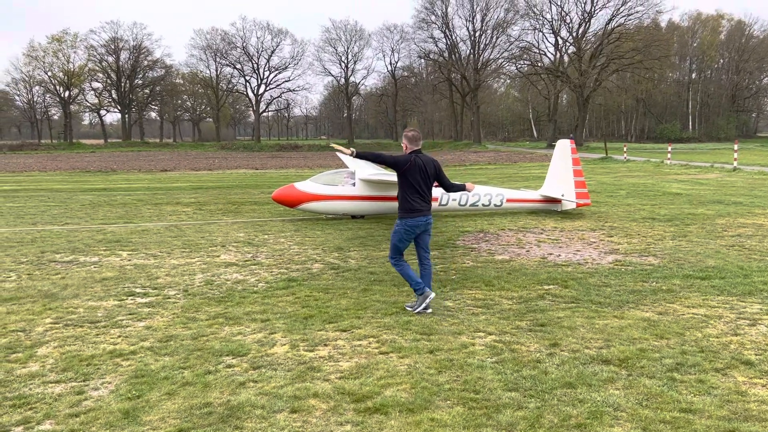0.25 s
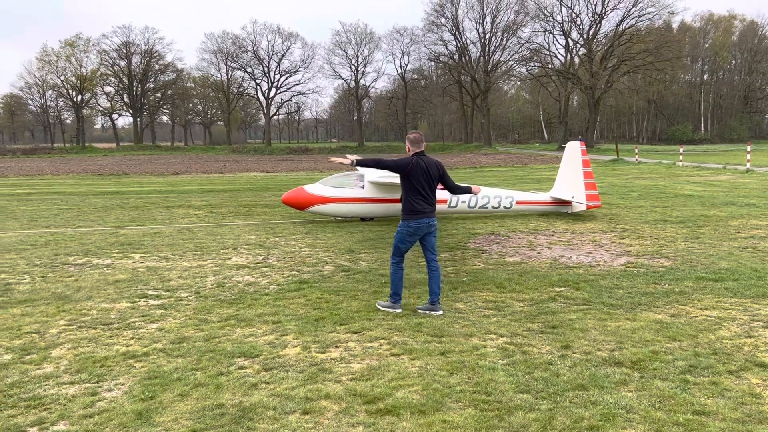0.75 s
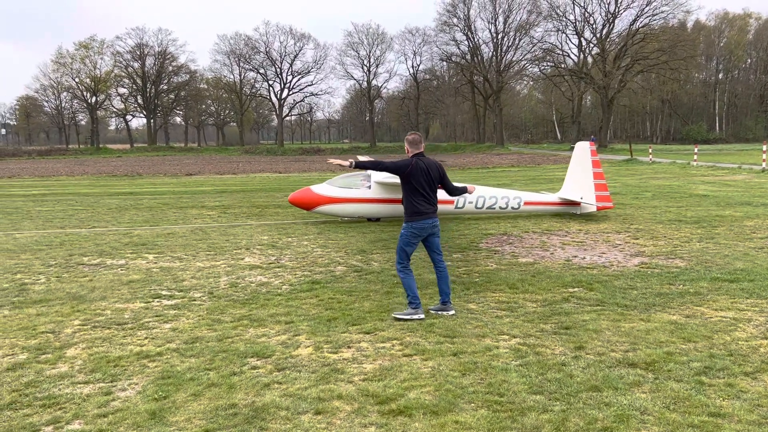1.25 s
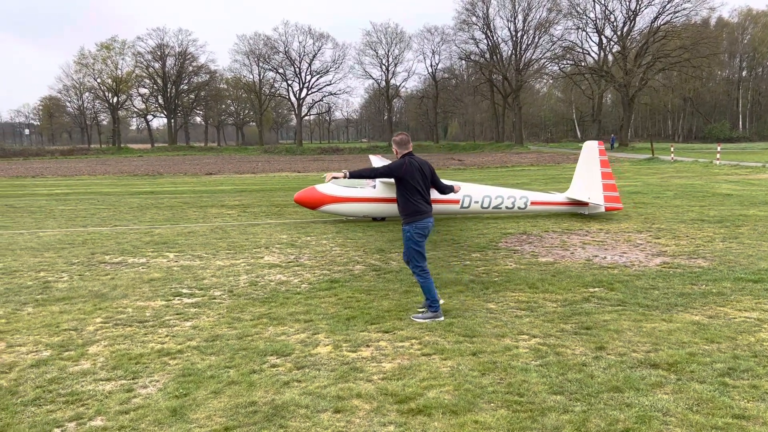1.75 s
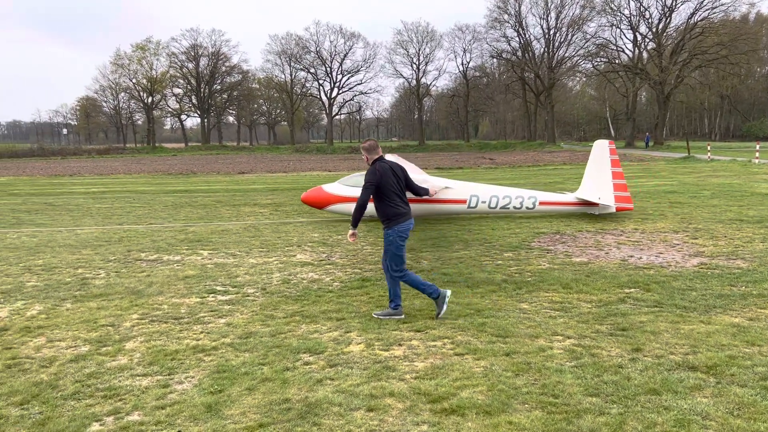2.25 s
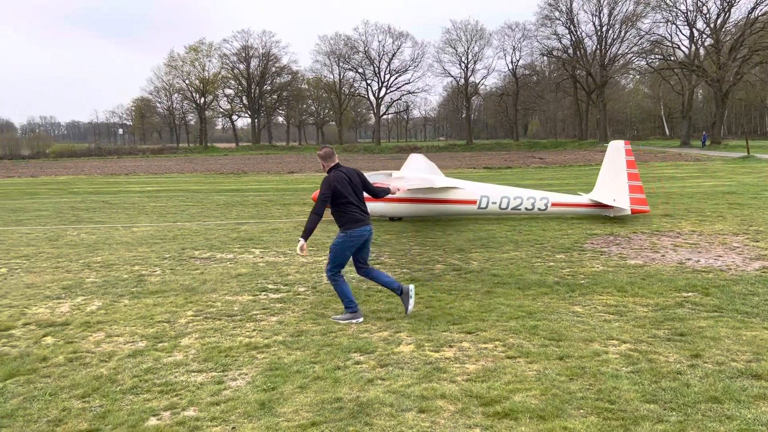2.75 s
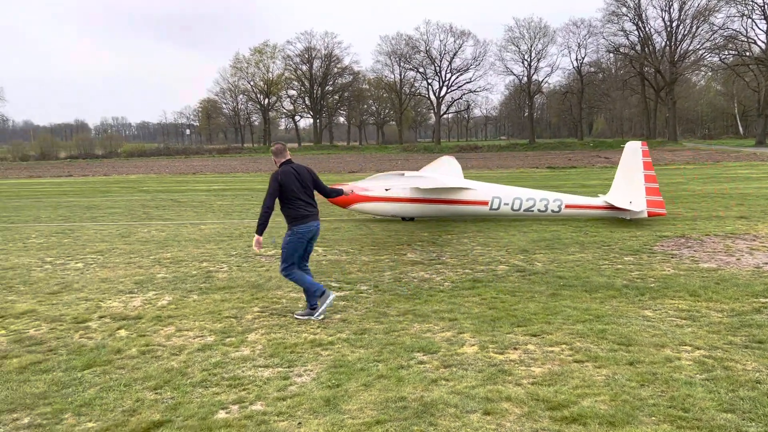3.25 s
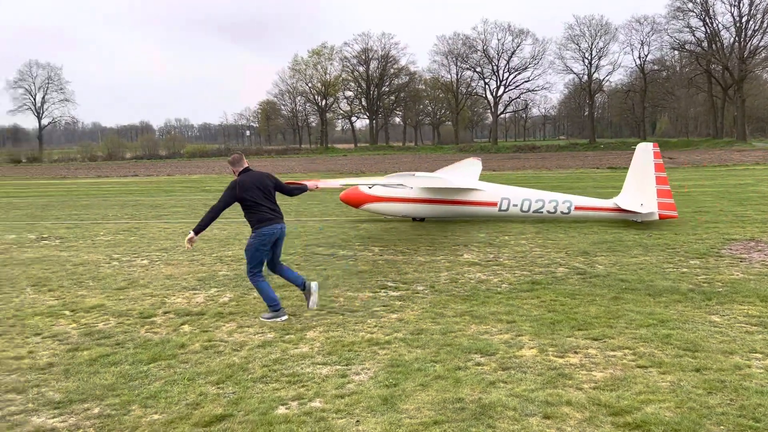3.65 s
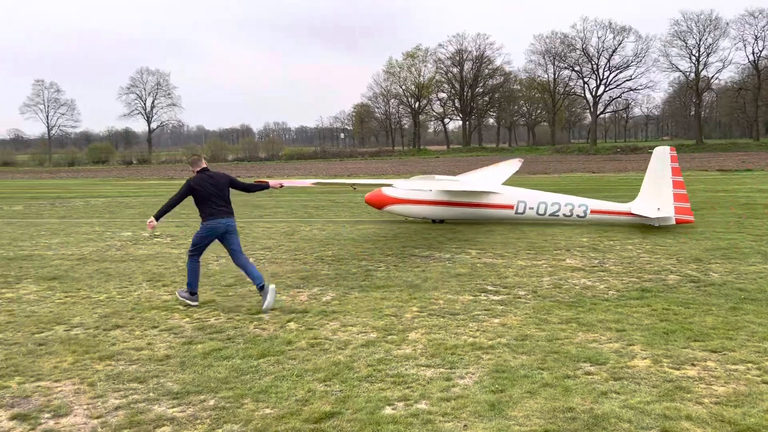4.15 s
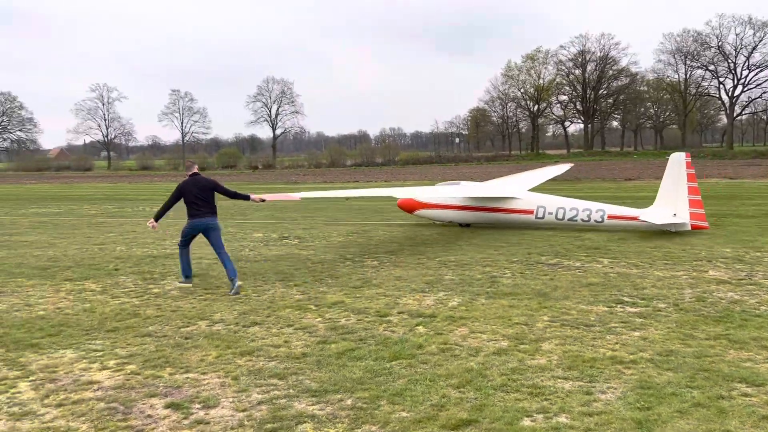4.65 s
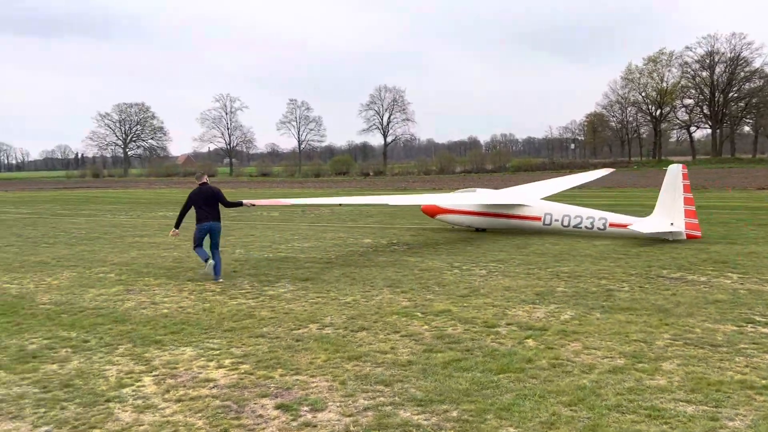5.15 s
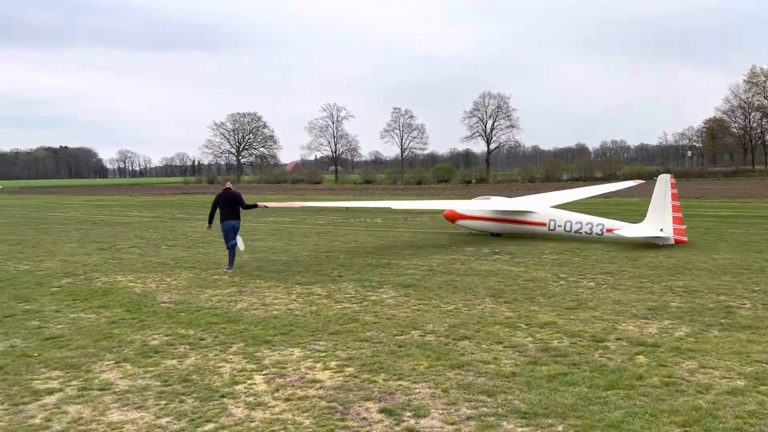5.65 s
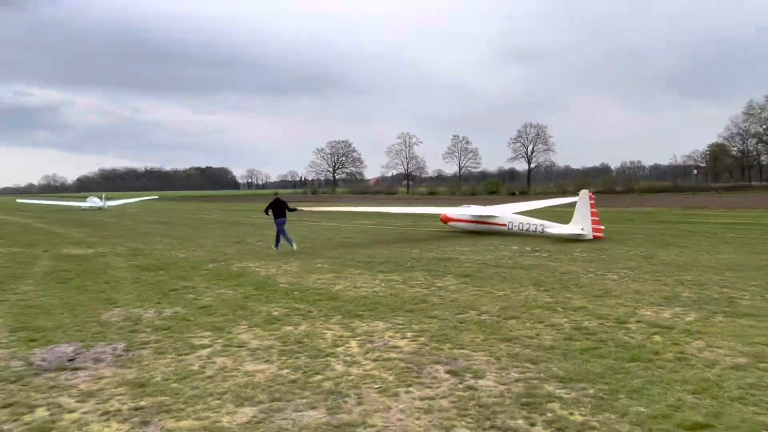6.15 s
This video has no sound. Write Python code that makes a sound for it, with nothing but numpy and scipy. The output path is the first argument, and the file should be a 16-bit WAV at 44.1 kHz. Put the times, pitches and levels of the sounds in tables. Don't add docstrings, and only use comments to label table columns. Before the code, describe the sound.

Outdoors on grass, a far-off small propeller engine sputters, revs up within two seconds and holds a raspy drone under buffeting wind gusts.

```python
import sys
import numpy as np
from scipy import signal
from scipy.fft import rfft, irfft, next_fast_len
from scipy.io import wavfile
from scipy.ndimage import uniform_filter1d

SR = 44100
rng = np.random.default_rng(int(sys.argv[2]) if len(sys.argv) > 2 else 0)


def voltage_ratio(decibels):
    exponent = np.asarray(decibels, float) / 20
    return 10 ** exponent


def digitize_waveform(pressure):
    field = np.atleast_2d(pressure).T
    bounded = np.clip(field, -1, 1)
    quanta = np.round(bounded * 32767).astype(np.int16)
    wavfile.write(sys.argv[1], SR, quanta)


N = 281710
FULL_HZ = 81.5
OPPOSITE = np.array([[1], [-1]])


def curves(table):
    s, *columns = np.transpose(table)
    return [np.interp(np.arange(N) / SR, s, c) for c in columns]


def at(table, hz):
    f, v = np.transpose(table)
    return np.interp(np.log(hz), np.log(f), v)


def bump(s, length):
    return np.exp(-((np.arange(N) / SR - s) / max(length, .005)) ** 2)


def walk(rate):
    k = int(SR / rate)
    held = np.repeat(rng.standard_normal(N // k + 1), k)
    return 1.3 * uniform_filter1d(uniform_filter1d(held, k), k)[:N]


def band(hz, width, colour):
    size = next_fast_len(N)
    f = np.fft.rfftfreq(size, 1 / SR) + 1
    inside = abs(f - hz) < width
    shape = voltage_ratio(at(colour, f[inside])) * np.exp(-(2 * (f[inside] - hz) / width) ** 4)
    spectrum = np.zeros(len(f), complex)
    spectrum[inside] = np.sqrt(size / 2) * shape * (rng.standard_normal((len(shape), 2)) @ [1, 1j])
    return irfft(spectrum, size)[:N]


def steady(colour, db):
    x = band(0, SR, colour)
    return voltage_ratio(db + walk(10)) * x / x.std()


def tones(turns, orders, flutter_db, drift):
    out = 0
    for k, db in orders:
        level = np.sqrt(2) * voltage_ratio(db + flutter_db * walk(5))
        phase = 2 * np.pi * k * turns + drift * np.sqrt(k) * walk(6) + 7 * rng.random()
        out = out + level * np.sin(phase)
    return out


# time in seconds, blade rate in Hz.
BLADE_RATE = [
    (0, 40.14),
    (.49, 48.81),
    (.8, 51.92),
    (1.27, 55.84),
    (1.45, 61.16),
    (1.7, 69.61),
    (2.09, 78.3),
    (2.3, 79.84),
    (2.55, 81.05),
    (6.39, 80.93),
]


def blade_rate():
    hz = np.minimum(curves(BLADE_RATE)[0], FULL_HZ)
    return uniform_filter1d(hz, size=SR // 8, mode="nearest")


# time in seconds, blade level in dB, overtones against the fundamental in dB.
PROPELLER_LEVEL = [(0, -39.5, -2), (.2, -44.5, 3), (.8, -33.5, -1.5), (1.25, -25.5, -8), (1.7, -23, -2.5),
                   (2.15, -29, 9), (2.45, -30.5, 6.5), (2.9, -30.5, 5.5), (3.25, -27.5, 5.5),
                   (3.65, -25.5, 4.5), (3.95, -25, -0.5), (4.55, -25.5, -2), (4.9, -22, -9.5),
                   (5.2, -20.5, -7.5), (5.5, -23, -31.5), (5.75, -22.5, -14), (5.95, -18.5, -13.5),
                   (6.39, -29.5, -8.5)]
# frequency in Hz, level in dB.
RADIATION = [(42, -24.5), (55, -11.5), (68, -0.5), (105, 3.5), (140, 1), (215, -0.5), (245, -8), (325, -23)]
BLADE_SHAPE = [.9, -1.2, -2.2, -3.5]
# time in seconds, tone number, length in seconds, change in dB.
TONE_FADES = [(0.549, 4, 0.33, 4.5), (0.797, 3, .4, 3), (0.97, 1, 0.076, -15), (1.505, 3, 0.098, 4.5),
              (1.64, 4, 0.22, 5), (2.15, 4, 0.055, -11), (2.588, 3, .15, -5), (3.105, 4, .35, 9.5),
              (3.565, 3, 0.13, -7), (3.7, 4, .15, -8), (3.99, 3, 0.069, 3.5), (4.158, 3, 0.13, -12.5),
              (4.19, 2, 0.13, -18.5), (4.74, 3, 0.23, -14), (4.977, 2, 0.091, -6.5), (5.151, 3, 0.12, 4),
              (5.408, 1, 0.012, -16.5), (5.582, 1, 0.017, -9), (5.727, 1, 0.021, -8.5), (5.95, 2, .12, 3),
              (9.1, 1, .02, -9), (2.3, 1, 0.014, -3), (6.222, 3, .15, -23.5), (.8, 4, .08, -3.5)]
# frequency in Hz, level in dB.
UPPER_TONES = [(210, -45), (270, -43), (330, -50), (400, -61), (480, -58), (600, -57), (750, -56),
               (950, -48), (1150, -46), (1400, -57), (1700, -63), (2200, -68)]


def propeller(hz, beats):
    level_db, overtone_db = curves(PROPELLER_LEVEL)
    tone_db = []
    for k in (1, 2, 3, 4):
        step_db = -2.5 * max(k - 2, 0)
        tone_db.append(level_db + at(RADIATION, k * hz) + overtone_db * (k > 1) + step_db)
    for s, tone, length, db in TONE_FADES:
        tone_db[round(tone) - 1] = tone_db[round(tone) - 1] + db * bump(s, length)
    low = 0
    for k, db in enumerate(tone_db):
        level = np.sqrt(2) * voltage_ratio(db + 0.6 * walk(20) + .35 * k * walk(9))
        low = low + level * np.sin(2 * np.pi * (k + 1) * beats + BLADE_SHAPE[k])

    slow_db = 2.5 * (FULL_HZ - hz)
    orders = []
    for k in range(5, 27):
        loss_db = slow_db * np.clip(k * hz / 100 - 3.6, 0, 1)
        orders.append((k, at(UPPER_TONES, k * hz) - loss_db))
    beam_db = -6 * (1 - bump(3.7, 1.5))
    upper_db = .5 + .6 * np.minimum(level_db + 32, 0) + beam_db
    return low + voltage_ratio(upper_db) * tones(beats, orders, 3.2, .33)


# multiple of the crank rate, level in dB.
CRANK_TONES = [(.5, -50), (1, -50.5), (1.5, -62), (2, -33), (3, -51), (4, -56)]
# time in seconds, load in dB.
ENGINE_LOAD = [
    (0, -8.5),
    (.5, -1.5),
    (1.2, -9),
    (1.7, 0.5),
    (2.1, 0),
    (3, -7.5),
    (4.3, -11.5),
    (5, -8),
    (6.39, -11),
]
# frequency in Hz, level in dB per Hz.
EXHAUST_COLOUR = [(60, -7.5), (100, -4.5), (140, 13), (200, 11.5), (280, 6), (370, 0), (480, -39)]


def engine(beats):
    load_db, = curves(ENGINE_LOAD)
    crank_turns = beats * 2.273 / 2
    hum = voltage_ratio(load_db) * tones(crank_turns, CRANK_TONES, 1.4, 0.57)
    return hum + steady(EXHAUST_COLOUR, -39 + 0.43 * load_db)


# time in seconds, rasp level in dB, treble tilt in dB per octave.
RASP_LEVEL = [(0, -3.5, -0.5), (.4, 1.5, -2.5), (.8, 1, -3.5), (1.2, 0.5, -3), (1.5, 0.5, 0), (2, 1.5, 1),
              (2.4, 3, 2), (2.9, 3, 1.5), (3.15, -0.5, 0), (3.6, -3.5, 2), (4.5, -2, 1), (5.2, -5, 3),
              (5.7, -3.5, 2), (6.1, -0.5, .5), (6.39, 0.5, 0.5)]
# frequency in Hz, level in dB per Hz.
RASP_COLOUR = [(300, -21), (420, -7), (600, -7.5), (1150, -5.5), (1400, 0.5), (1650, 0.5), (2000, -5),
               (3000, -7.5), (3500, -13), (4700, -18), (5400, -15.5), (6300, -22), (8600, -26),
               (10500, -33.5), (12500, -37), (14600, -46)]
# time in seconds, centre in Hz, length in seconds, lift in dB.
SWISHES = [(.08, 4100, .06, 1.5), (.19, 6000, 0.035, 12.5), (0.27, 4580, 0.036, 8), (.58, 8500, .012, 11),
           (0.293, 8600, 0.011, 8), (0.198, 3460, 0.17, -4), (0.955, 6140, 0.13, 9.5),
           (0.999, 4400, 0.48, -5), (1.102, 1000, 0.47, 6), (1.412, 6310, 0.17, 15), (1.502, 4860, .1, 3),
           (2.131, 6030, .03, 8), (2.42, 3030, .17, 6), (2.5, 7600, 0.014, 8), (2.84, 3110, 0.13, 6),
           (3.876, 3704, 0.17, 7.5), (3.1, 2220, 0.081, -2), (4.865, 3700, 0.19, 9),
           (5.272, 3700, 0.18, 8.5), (5.627, 4670, 0.11, 7), (6.1, 5000, 0.32, 5.5), (6.3, 10300, .18, 9.5)]
# frequency in Hz, diffuse share.
SCATTER = [(60, .05), (300, 0.15), (600, 1.6), (900, 1), (1500, 0.25), (2500, 0.1), (4500, 0.25),
           (8000, .12), (14000, 0.07)]


def rasp(blade_hz, beats):
    depth = np.interp(blade_hz, [56, 79], [.7, .38])
    beats = beats + .2
    puff_size = voltage_ratio(1.7 * rng.standard_normal(1000))
    puff = np.exp(-(beats % 1) / 0.27) * puff_size[beats.astype(int)]
    puff = 1.3 * uniform_filter1d(puff, size=150)
    level_db, tilt_db = curves(RASP_LEVEL)
    low_db = -1.5 - 0.03 * (FULL_HZ - blade_hz)
    swishes = [(centre, db * bump(s, length)) for s, centre, length, db in SWISHES]
    out, shared = 0, walk(9)
    for hz in 400 * 2 ** np.arange(0, 5.3, 1 / 3):
        octaves = np.log2(hz / 1650)
        if octaves > 0:
            db = level_db + tilt_db * octaves
        else:
            db = level_db + min(-octaves, 1) * (low_db - level_db)
        for centre, swell in swishes:
            if centre / 2 < hz < centre * 2:
                db = db + swell * np.exp(-(np.log2(hz / centre) / .28) ** 2)
        db = db + .7 * shared + 1.2 * walk(18)
        beat = np.clip(depth * min(1, 2600 / hz), 0, 1)
        direct = band(hz, hz / 4, RASP_COLOUR)
        diffuse = np.sqrt(at(SCATTER, hz)) * band(hz, hz / 4, RASP_COLOUR)
        out = out + voltage_ratio(db) * (1 - beat + beat * puff) * np.array([direct, diffuse])
    return voltage_ratio(-46) * out / out[0].std()


# time in seconds, peak in dB.
SLAPS = [(0.0373, -46), (0.086, -46.5), (0.2533, -48.5), (0.3206, -45.5), (.3425, -45.5), (.381, -42.5),
         (0.4064, -38.5), (0.4251, -38.5), (0.4839, -49), (0.6902, -44.5), (0.7278, -45.5), (0.7668, -42),
         (.8475, -45), (0.9952, -52), (1.0323, -46.5), (1.068, -47.5), (1.112, -44), (1.259, -43),
         (1.429, -40.5)]


def blade_slaps():
    out, t = np.zeros(N + SR), np.arange(SR // 4) / SR
    edge = signal.butter(4, [1000, 2900], "band", fs=SR, output="sos")
    envelope = 1.6 * np.exp(-t / .003) * (1 - np.exp(-t / .0008))
    for s, db in SLAPS:
        crack = np.sin(2 * np.pi * 1454 * t) + .9 * rng.standard_normal(len(t))
        out[int(s * SR):][:len(t)] += voltage_ratio(db + 12.5) * signal.sosfilt(edge, crack * envelope)
    return out[:N]


# time in seconds, length in seconds, level in dB.
HISS_MOMENT = (2.374, 0.15, -41)
# frequency in Hz, level in dB per Hz.
HISS_COLOUR = [(1400, -30.5), (1560, 4), (1640, 7.5), (1720, -2.5), (1900, -44)]


def narrow_hiss():
    s, length, db = HISS_MOMENT
    return bump(s, length) * steady(HISS_COLOUR, db)


# frequency in Hz, lead in radians.
PORT_PHASE = [(0, 0), (1550, 4.4), (1810, 6.9), (2410, 6.5), (3360, 8.5), (4740, 6.7), (6290, 12.6),
              (6630, 12.7), (8180, 11.5), (9040, 9.6), (10900, 9.3), (11800, 6.3), (14000, 6.3),
              (14600, 3.2)]
# frequency in Hz, left minus right in dB.
PORT_BALANCE = [(60, 1.5), (110, -0.5), (200, 2), (370, 0.5), (690, 1), (1260, -1.5), (2320, 4), (4270, 3),
                (7850, 0.5), (14400, -3)]


def ports(x):
    f = np.fft.rfftfreq(N, 1 / SR)
    lead = np.interp(f, *np.transpose(PORT_PHASE))
    lead = lead * (1 + 0.52 * np.exp(-f / 350))
    half = voltage_ratio(at(PORT_BALANCE, f + 1) / 2) * np.exp(.5j * lead)
    return irfft(rfft(x) * np.array([half, 1 / half]), N)


# time in seconds, peak in dB, time to die by 60 dB in seconds.
KNOCKS = [
    (1.519, -28, .5),
    (5.486, -31.5, 0.25),
]


def nearby_knocks():
    out, t = np.zeros(N + SR), np.arange(SR // 4) / SR
    body = signal.butter(2, [300, 1050], "band", fs=SR, output="sos")
    for s, db, t60 in KNOCKS:
        thud = signal.sosfilt(body, rng.standard_normal(len(t)))
        decay = np.exp(-np.log(1000) * t / np.clip(t60, .1, .45))
        out[int(s * SR):][:len(t)] += voltage_ratio(db + 2) * thud * decay
    return out[:N]


# time in seconds, rumble in dB, share unrelated between ports from 0 to 1.
WIND_LEVEL = [(0, -53, 0.9), (.6, -53.5, .4), (1.3, -37, .35), (2.1, -45.5, .33), (2.8, -45, 0),
              (3.7, -41.5, .2), (4.5, -42.5, 0), (5.3, -39, .4), (5.5, -30, 0.5), (6.05, -28, 0.64),
              (6.39, -37.5, 1)]
# frequency in Hz, level in dB per Hz.
WIND_COLOUR = [(22, -50.5), (32, -24.5), (45, -5), (63, 1), (100, -4), (135, -8), (180, -10.5), (250, -26),
               (350, -31.5), (500, -37)]
# time in
# seconds, length in seconds, dB over the rumble.
GUSTS = [(0.468, .05, 10), (0.753, .05, 15.5), (1.01, .05, 17), (1.28, .04, 7), (3.282, .04, 2),
         (3.434, .04, 12), (3.72, .05, 14), (3.9, .05, 15), (4.35, .04, 7), (4.54, .05, 4),
         (5.048, .05, 15), (5.423, 0.016, 18), (5.49, 0.024, 6), (5.546, 0.017, 13), (5.623, .03, 10.5),
         (5.685, 0.013, 4), (5.767, 0.042, 3), (5.836, 0.024, 17), (5.917, 0.019, 9), (5.99, .02, 4),
         (6.036, 0.039, -1), (6.106, 0.04, 8), (6.254, .04, 12.5)]


def wind():
    rumble_db, share = curves(WIND_LEVEL)
    swell_db = sum(db * bump(s, length) for s, length, db in GUSTS)
    gust_db = rumble_db + swell_db
    tilt_db = 2.5 - 0.61 * swell_db
    focus_db = 0.28 * np.maximum(gust_db + 44, 0)
    share, out, shared = np.clip(share, 0, 1), 0, walk(18)
    for hz in 25 * 2 ** np.arange(0, 4.4, 1 / 3):
        both = band(hz, hz / 4, WIND_COLOUR)
        apart = band(hz, hz / 4, WIND_COLOUR)
        db = gust_db + 32.5 + tilt_db * np.log2(hz / 50)
        db = db - focus_db * min(abs(np.log2(hz / 88)), 1)
        db = db + 1.8 * shared + walk(8)
        out = out + voltage_ratio(db) * (both + share * apart * OPPOSITE)
    return out


def scene():
    hz = blade_rate()
    beats = np.cumsum(hz) / SR
    direct, diffuse = rasp(hz, beats)
    plane = propeller(hz, beats) + engine(beats) + direct + blade_slaps() + narrow_hiss()
    return ports(plane + diffuse * OPPOSITE) + nearby_knocks() + wind()


def top_cut(x):
    return signal.sosfilt(signal.butter(12, 15030, fs=SR, output="sos"), x)


def record(dry):
    ceiling = 0.79
    mix = ceiling * np.tanh(dry / ceiling)
    return top_cut(mix)


dry = scene()
out = record(dry)
digitize_waveform(out)
```